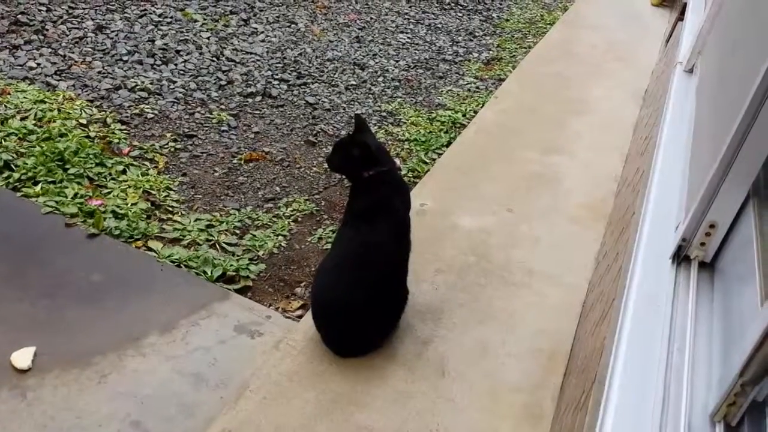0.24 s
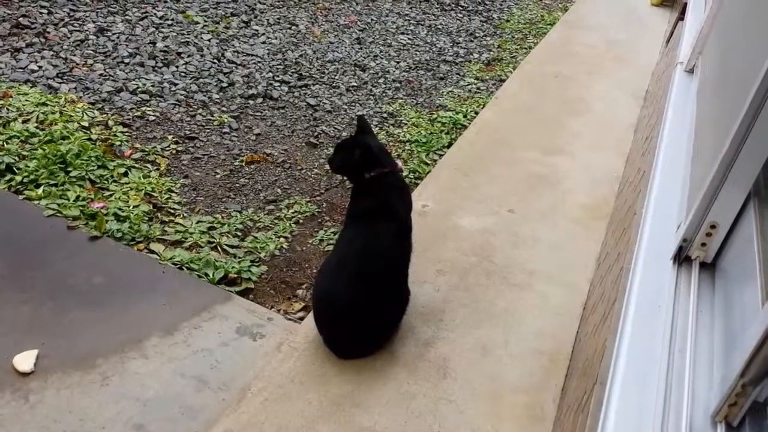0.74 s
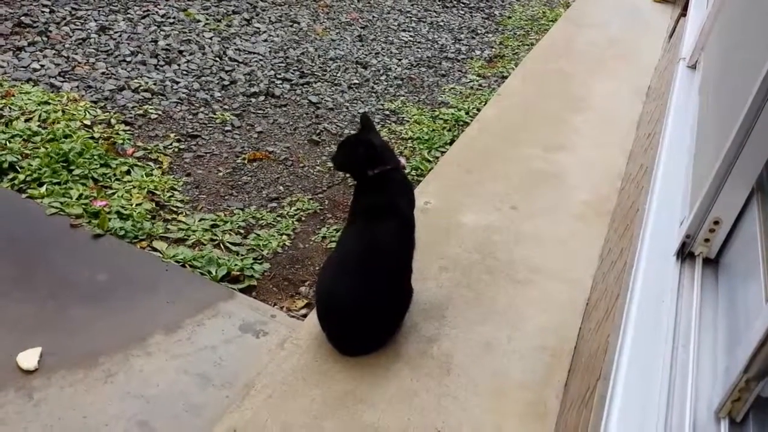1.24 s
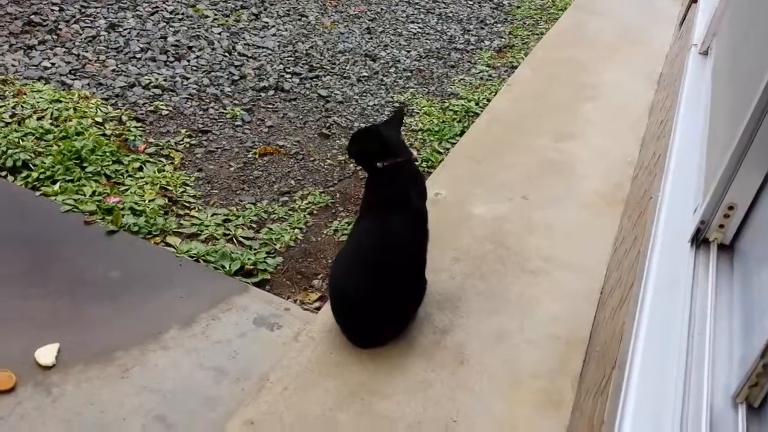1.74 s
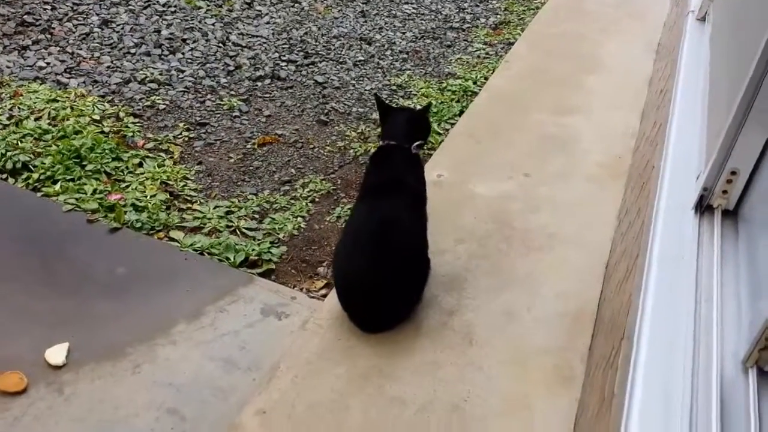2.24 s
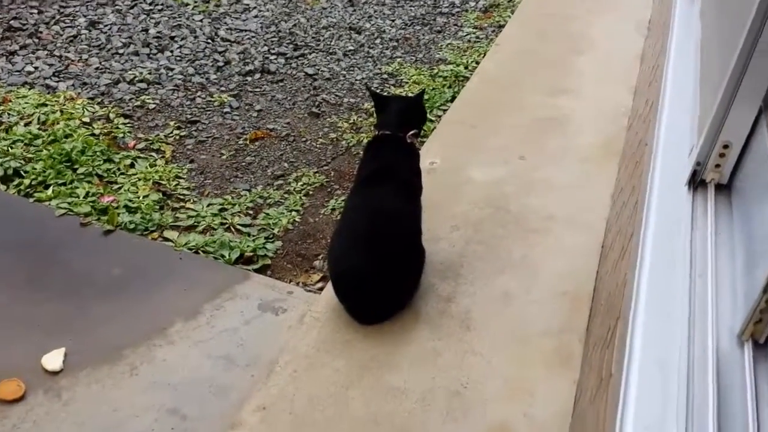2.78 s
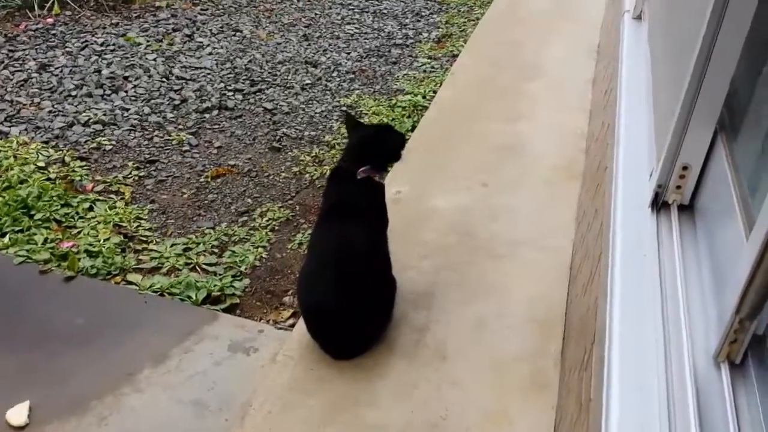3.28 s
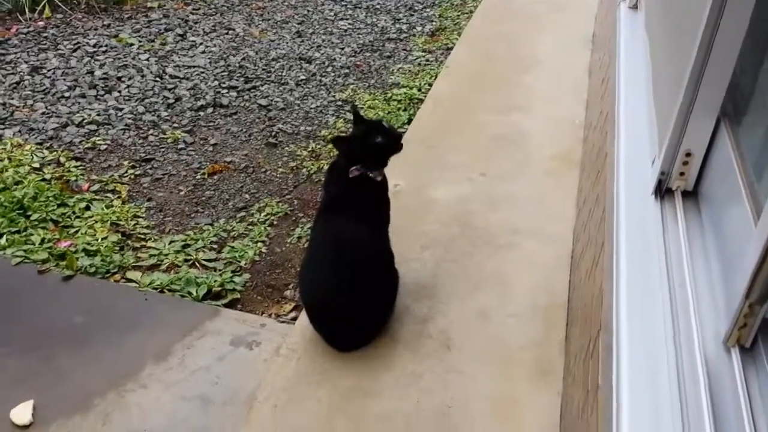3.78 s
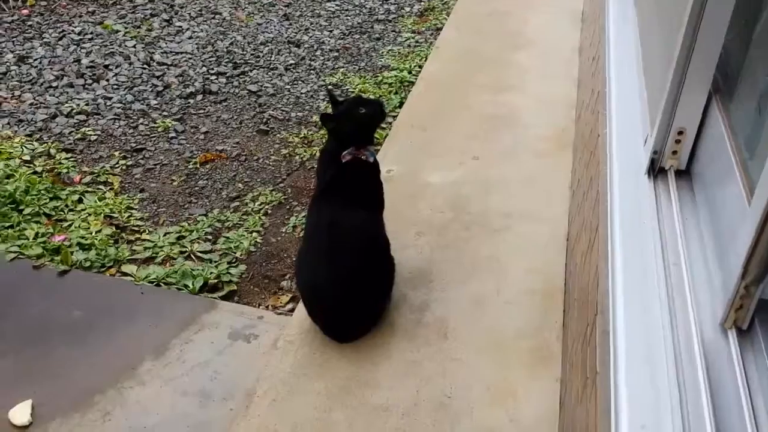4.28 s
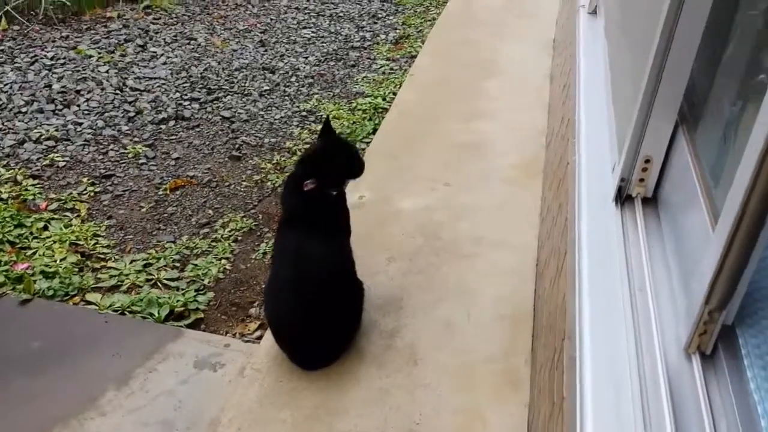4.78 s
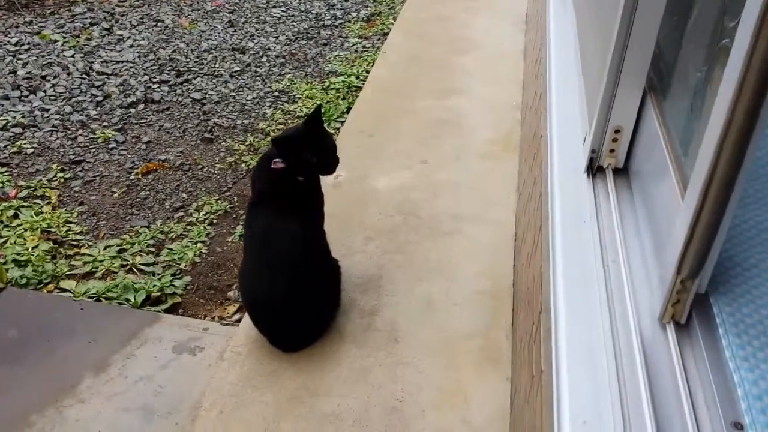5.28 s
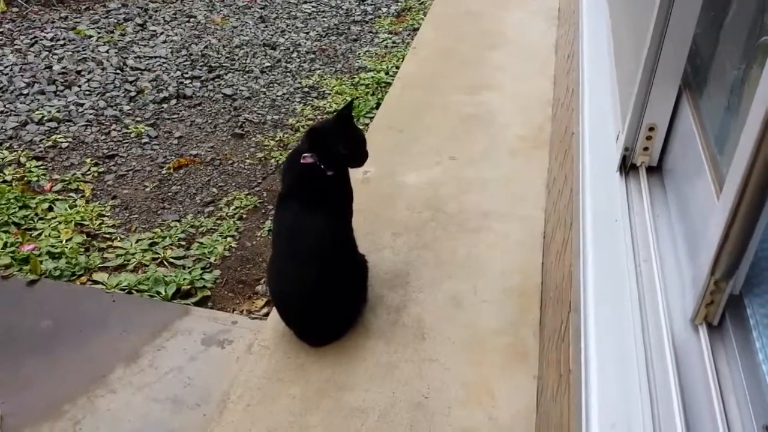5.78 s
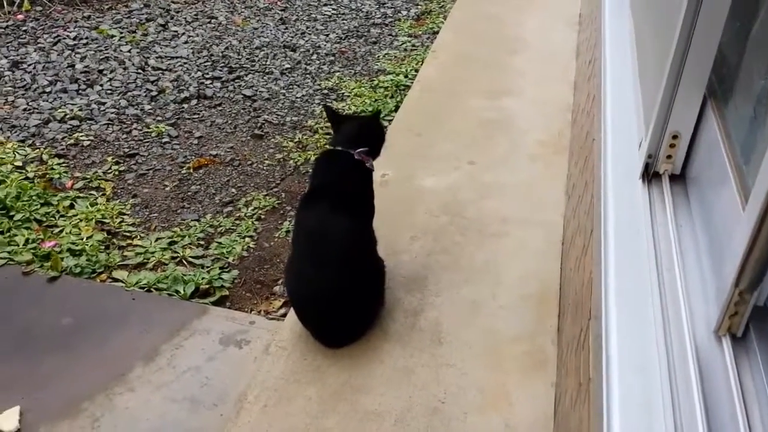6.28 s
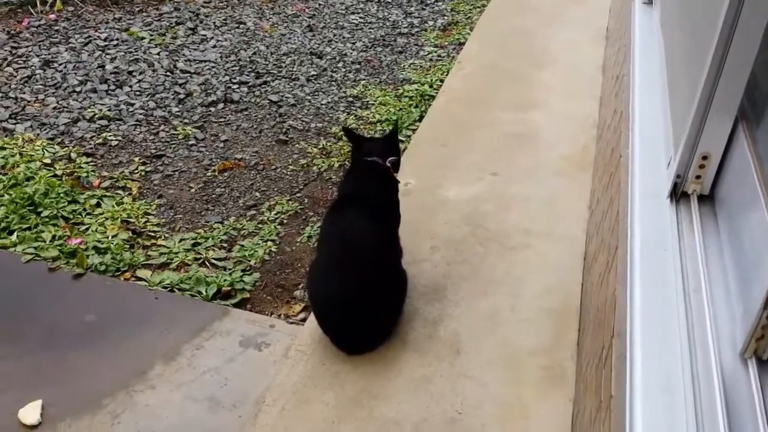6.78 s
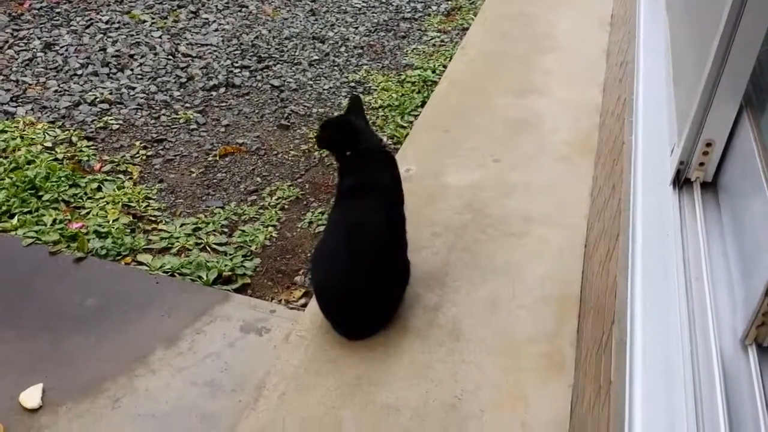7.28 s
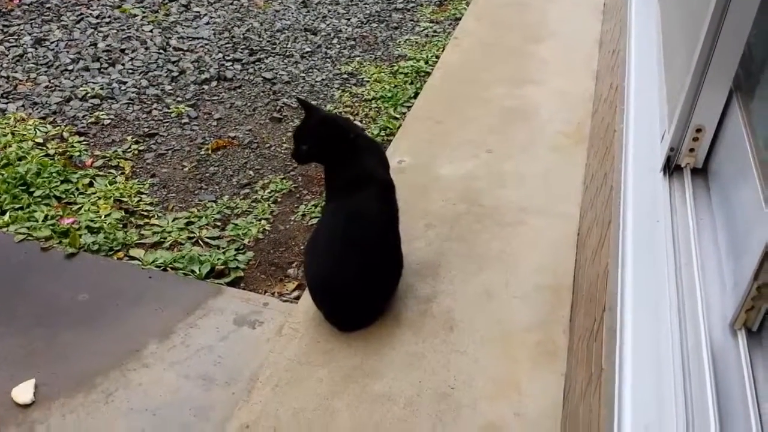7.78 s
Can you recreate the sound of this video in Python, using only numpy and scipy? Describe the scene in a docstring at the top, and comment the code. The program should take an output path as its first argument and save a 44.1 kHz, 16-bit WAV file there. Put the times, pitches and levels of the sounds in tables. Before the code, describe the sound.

The setting is quiet and outdoors, with faint air hiss, a distant traffic hum, a thin high insect tone and occasional far bird chirps. Two tiny ticks come around 1 second. From 1.7 to 2.5 seconds a cat meows, hoarse and wavering, ending lower, with a short echo off a house wall. At 2.1 seconds a sharp, very loud pop hits the right side of the microphone. Light rustling and clicks start around 3 seconds, and a second, longer raspy meow runs from 3.4 to 4.5 seconds, sliding down in pitch and ending with a crisp snap. A lull follows, broken by a brief crackle near 5.8 seconds. From 6.7 seconds, something like a thin bag crinkles and snaps close to the microphone, growing denser and louder until the end at 8 seconds. A few soft, low bumps touch the microphone along the way.

```python
"""A cat meows twice, hoarse and wavering, on a concrete path beside a house wall that echoes it.
Its vocal folds make a tone with puffs of breath, and its mouth shapes the vowel.
Close by, something like a thin bag rustles and snaps as its creases give way. Soft bumps touch the
camera, and one sharp pop hits the right microphone port (the opening that lets sound in).
Behind it all the air hisses, far traffic hums, and an insect and far birds sing faintly."""
import sys
import numpy as np
from scipy import signal
from scipy.fft import rfft, irfft, next_fast_len
from scipy.io import wavfile
from scipy.ndimage import uniform_filter1d, map_coordinates

SR = 44100
rng = np.random.default_rng(int(sys.argv[2]) if len(sys.argv) > 2 else 0)


def transcribe(signal):
    """Save signal, clipped to [-1, 1], as a 16-bit WAV file at the path in sys.argv[1]."""
    frames = np.atleast_2d(signal).T
    limited = np.clip(frames, -1, 1)
    pcm = np.round(limited * 32767).astype(np.int16)
    wavfile.write(sys.argv[1], SR, pcm)


N = 354123


def cat():
    """Two meows, each a chain of short notes that ends lower, with the mouth nearly shut."""
    # start/s, first pitch/Hz, last pitch/Hz, level/dB, mouth open/0-1, hoarseness/0-1,
    # boosts of partials 2, 3 and 4/dB, boost of the upper partials/dB
    first_notes = [(1.7, 791.1, 827.8, -62.5, 0.03, .4, -3, -3, -20, -30),
                   (1.772, 744.3, 768, -43.5, 1, 0.35, -.5, -12, -20.5, -41),
                   (1.81, 768.8, 814, -40.5, 0.99, 0.4, -.5, -1.5, 12.5, -24),
                   (1.865, 875, 889.6, -35.5, 1, .55, -.5, -1.5, -3.5, -35.5),
                   (1.893, 797.5, 801.5, -39.5, 1, .6, -.5, -3, -2, -29),
                   (1.945, 844.5, 840.7, -42.5, 1, 0.55, -.5, -9, -6, -31.5),
                   (1.968, 818.2, 812.8, -39, 0.94, 0.52, -.5, -1.5, -8.5, -22.5),
                   (2.018, 725.2, 729.7, -41, 1, 0.57, -.5, -12, -7, -26),
                   (2.042, 787.2, 831.2, -40, 1, 0.4, -.5, -1.5, -8, -32.5),
                   (2.075, 757, 728, -40.5, 0.84, 0.7, -.5, -12, -3, -35),
                   (2.1, 735, 740, -56, 0.9, 0.9, -.5, -3, -3, -35),
                   (2.127, 735, 702, -38.5, 1, 0.43, -.5, -1.5, -9, -38),
                   (2.195, 680.5, 705.1, -40, 0.92, 0.35, -.5, -1.5, 0, -33.5),
                   (2.302, 677.5, 680.8, -42.5, .9, 0.4, -.5, -3, 0, -41),
                   (2.372, 660, 655, -61, 0.19, .5, -8, -1.5, 0, -30),
                   (2.395, 650, 664, -59, .2, .4, -7, -1.5, 3.5, -28.5),
                   (2.48, 665.4, 630.2, -64.5, 0.08, 0.4, -8, -1.5, -1.5, -30)]
    second_notes = [(3.352, 715, 790, -39, 1, .75, -12, -.5, -10, -20),
                    (3.392, 800, 835, -46, 1, 0.89, -6, -3, -4, -18),
                    (3.428, 875, 850, -48.5, 0.58, 0.72, -3, -1.5, -3, -21),
                    (3.462, 840, 820, -54, 0.58, 0.8, -3, -3, -3, -21),
                    (3.49, 861.3, 833.2, -42, 1, 0.563, -1.5, -.5, -5.5, -23.5),
                    (3.568, 766.1, 784.2, -43.5, 0.634, .55, -1.5, -4, 3.5, -24),
                    (3.628, 796.4, 779.9, -44.5, 0.383, .5, -3, -1.5, 2, -16.5),
                    (3.73, 811.6, 820.7, -41, 0.234, .45, 1.5, -1.5, -8, -16),
                    (3.79, 774.5, 746.9, -45.5, 0.266, .45, -.5, -4, 3, -12),
                    (3.85, 745.5, 726.4, -44.5, 0.39, .45, -5, -3, 4, -15),
                    (3.91, 735, 710, -47, 0.18, .5, -4, -4, 3.5, -13),
                    (3.99, 708, 696, -47, 0.18, .4, -2.5, -5, 0, -13),
                    (4.075, 670, 628.8, -51, 0.223, 0.4, -8, -.5, 2, -13),
                    (4.15, 636, 628.8, -52, 0.158, 0.3, -4, -3, 1.5, -15),
                    (4.31, 632.5, 649.8, -52, .2, 0.3, -5, -2.5, 2.5, -10.5),
                    (4.46, 640, 628, -52, 0.023, 0.3, -6, -.5, -4.5, -17.5),
                    (4.503, 600, 490, -57, 0.029, 0.35, -15, -15, -12, -17.5)]
    # how the mouth shapes the four lowest partials: f/Hz, gain when open/dB, gain when nearly shut/dB
    first_vowel = [(703, -29.5, -11), (835.6, -14, 2.5), (1350, -1, -2.5), (1613, 1, -8.5), (2090, -18, -3),
                   (2480, -13, -12), (2752, -20, 3), (3280, -31, -19.5)]
    second_vowel = [(613, -15, 0), (828, -13.5, -2.5), (1285, -10.5, -5.5), (1562, -10, 4),
                    (1875, -6, -3.5), (2310, 1, -9), (2577, 0.5, -1.5), (3120, -0.5, -10),
                    (3510, -8.5, -18.5)]
    # one row a meow: end/s, first left over right/dB, last left over right/dB
    endings = [(2.55, -0.5, 8), (4.539, 3, 4.6)]
    return meow(first_notes, first_vowel, endings[0]) + meow(second_notes, second_vowel, endings[1])


def meow(notes, vowel, ending):
    """Vocal folds make partials (tones at multiples of the pitch) and puffs of breath."""
    # tone colour of the upper partials and of the breath: f/Hz, level/dB
    upper_colour = [(3200, -14), (3700, -12), (4200, -6), (5000, -20), (5700, -4), (6400, -4), (7200, -18),
                    (9000, -28)]
    breath_colour = [(300, -39), (800, -14), (1150, -4), (1600, 16), (2700, 3), (4000, -17), (6000, -16.5),
                     (10000, -20), (14800, -22.5)]
    glide_s, break_s, break_db = 0.014, 0.008, -7  # notes blend, with a brief dip at each break
    end_s, *pans_db = ending
    start, first_hz, last_hz, *held = np.transpose(notes)
    first = round(start[0] * SR)
    t = np.arange(first, round(end_s * SR)) / SR
    note = np.clip(np.searchsorted(start, t) - 1, 0, None)
    since = t - start[note]
    pitch = first_hz[note] + (last_hz - first_hz)[note] * since / np.diff(start, append=end_s)[note]
    pitch = uniform_filter1d(pitch, size=200)
    level_db, mouth, hoarse, *boosts_db, upper_db = [
        uniform_filter1d(column[note], round(glide_s * SR), mode="nearest") for column in held]
    level_db = level_db + uniform_filter1d(break_db * np.exp(-since / break_s), size=200)
    # the pitch jitters in small random steps, 43 a second, making the meow sound rough
    jitter = uniform_filter1d(rng.standard_normal(200)[((t - t[0]) * 43).astype(int)], size=60)
    shake = hoarse * (0.01209 * jitter + 0.016 * wobble(89.91, t))
    phase = 2 * np.pi * np.cumsum(pitch * (1 + shake)) / SR
    wide, shut = np.array(vowel)[:, [0, 1]], np.array(vowel)[:, [0, 2]]
    low_db = [level_db + mouth * along(wide, k * pitch) + (1 - mouth) * along(shut, k * pitch) + boost
              for k, boost in enumerate([0, *boosts_db], 1)]
    high_db = [level_db + upper_db + along(upper_colour, k * pitch) for k in range(5, 11)]
    voice = np.zeros((2, len(t)))
    for k, db in enumerate(low_db + high_db, 1):
        rasp = 3.77 * wobble(60.13, t) + 3.5 * wobble(170, t)
        fading = 1.3 * wobble(22, t)  # each partial comes and goes on its own
        for side in range(2):  # paths off wall and ground shift it differently at the two ports
            drift = uniform_filter1d(0.35 * np.sqrt(k) * wobble(24.95, t), size=16)
            flutter = uniform_filter1d(hoarse * (rasp + 3.3 * wobble(40.08, t)) + fading, size=16)
            voice[side] += np.sqrt(2) * amp(db + flutter) * np.sin(k * phase + drift)
    effort = np.sqrt(sum(amp(db) ** 2 for db in low_db))
    breath = coloured(white_noise(), breath_colour, alike=[(500, 0.65)])[:, :len(t)]
    puffs = breath * (1 + np.cos(phase))  # one each time the folds open
    fade = np.clip(np.minimum(t - t[0], t[-1] - t) / 0.0088, 0, 1)
    pan_db = np.linspace(*pans_db, len(t))
    call = fade * (voice + amp(-13.5) * effort * hoarse * puffs) * amp([pan_db / 2, -pan_db / 2])
    return np.pad(call, ((0, 0), (first, N - first - len(t))))


def rustle():
    """The bag rustles: clumps of tiny creases give way over the noise of rubbing."""
    # three tone colours of the rustle: f/Hz, level/dB
    crisp_colour = [(500, -22.5), (900, -1), (1500, -1), (2500, 6), (4500, 0), (5500, -3), (7500, -32),
                    (9500, -25)]
    bright_colour = [(3820, -14), (6500, -3), (7550, -5), (12800, -11.5), (13600, -18), (14900, -34.5)]
    dull_colour = [(24, -27), (40, -17), (224, -3.5), (329, 1), (390, -3), (890, -4), (1200, -8.5),
                   (1560, -23), (2640, -120)]
    # where the rustling is: t/s, left over right/dB
    position = [(0, 0), (2.95, 0), (3.04, -9), (3.3, -9), (3.45, -9), (3.6, -3), (4.4, -2), (4.6, 0),
                (6.7, 1), (8.03, 1)]
    t = np.arange(N) / SR
    crisp_db, bright_db, dull_db, crackle = handling(t)
    spikes = (rng.random(N) < .02) * amp(np.minimum(4 * rng.exponential(size=N), 9))
    creases = signal.lfilter([1], [1, -.97], spikes)  # each dies in about a millisecond
    clumps = amp(2.6 * crackle * wobble(110, t))
    grain = (1 + 1.1 * crackle * creases) / (1 + 1.1 * crackle) * clumps
    noise = np.sqrt(1 - crackle) * white_noise() + np.sqrt(crackle) * patchy_noise(depth_db=4)
    crisp = amp(crisp_db + 1.92) * coloured(noise, crisp_colour, alike=[(2000, 0.261)])
    bright = amp(bright_db + 2.5) * coloured(noise, bright_colour, alike=[(9000, 0.28)])
    dull_gain = amp(dull_db - 1 + 2.37 * wobble(30, t))
    dull = dull_gain * coloured(white_noise(), dull_colour, alike=[(300, 0.557)])
    pan_db, = curves(position, t)
    pan = amp([pan_db / 2, -pan_db / 2]) / np.sqrt(np.cosh(pan_db * np.log(10) / 20))  # same total power
    return (left_first(grain * (crisp + bright), seconds=0.0002229) + dull) * pan


def handling(t):
    """Strokes swell and fade over faint stirring: crisp, bright and dull dB, and the share of crackle."""
    # start/s, end/s, 20 dB rise/s, 20 dB fall/s, crisp level/dB,
    # bright over crisp/dB, dull over crisp/dB, crackle/0-1
    strokes = [(0.807, .87, .12, .3, -71, -2.5, -2, 0.05), (1.522, 1.535, 0.44, 0.15, -70.5, -4, -0.5, 0),
               (1.98, 2.042, .5, 0.41, -65.5, 1.5, 7.5, 0), (2.22, 2.33, 0.31, 0.35, -66.5, -1, -4.5, 0.01),
               (2.57, 2.598, 0.22, 0.566, -61.5, -12.5, -6.5, 0.02),
               (2.801, 2.875, 0.02, 0.059, -62, -2.5, -3.5, 0),
               (3.053, 3.119, .05, 0.11, -62.5, -6, 0, 0.08),
               (3.147, 3.215, 0.0358, 0.0484, -56, -3.5, -1, 0.14),
               (3.313, 3.347, 0.0012, 0.134, -54.5, -5.5, -3, 0.28),
               (3.34, 3.41, 0.1024, 0.106, -44.5, -5.5, -14, 0.08),
               (3.433, 3.535, 0.0661, 0.087, -55.5, -9, -7.5, 0.11),
               (3.563, 3.597, 0.1747, 0.091, -49, -10.5, -11, 0.17),
               (3.7, 3.85, .5, 1.393, -59.5, -4, -1, 0.04),
               (4.451, 4.497, 0.17, 0.0405, -53, -0.5, -4.5, 0.18),
               (5.806, 5.847, 0.0071, 0.033, -57, 1.5, -5.5, 0.45),
               (5.903, 5.914, 0.1172, 0.049, -64.5, 6.5, -0.5, 0.23),
               (6.823, 6.88, 0.055, .05, -50.5, 0.5, -5.5, 0.7),
               (6.866, 6.914, 0.0304, 0.0136, -45.5, 3.5, -12, 0.55),
               (6.934, 6.986, 0.051, 0.043, -54.5, 1.5, -1.5, 0.4),
               (7.001, 7.038, 0.06, 0.035, -50.5, 2, -2.5, 0.55),
               (7.052, 7.104, 0.0778, 0.046, -55, 1, -4.5, 0.44),
               (7.136, 7.185, 0.1471, .05, -59, -0.5, -3, 0.37),
               (7.316, 7.336, 0.0642, 0.045, -52.5, -1, -5.5, 0.59),
               (7.348, 7.383, 0.0486, 0.047, -48, 0, -3.5, 0.75),
               (7.401, 7.506, 0.1365, 0.078, -56.5, 2.5, -5.5, 0.53),
               (7.591, 7.622, 0.0448, 0.0252, -53.5, 4.5, -3, 0.59),
               (7.689, 7.726, 0.0379, .05, -54, 3.5, -6, 0.58),
               (7.747, 7.804, 0.0342, 0.036, -46, 2, -1, 0.74),
               (7.83, 7.838, 0.01, 0.036, -47, 0.5, -1.5, 0.52),
               (7.866, 7.939, 0.0034, 0.056, -48, 0.5, -5.5, 0.43),
               (7.936, 7.99, 0.0246, 0.062, -43.5, 0, -6.5, 0.95),
               (8.011, 8.03, 0.027, .1, -41, 1.5, -5.5, 0.82)]
    # faint rustle between strokes: t/s, crisp level/dB
    stirring = [(0, -78), (.6, -77), (1, -75), (1.4, -79.5), (1.8, -69), (2.7, -68.5), (2.95, -75.5),
                (3.5, -68), (4.4, -66.5), (4.56, -73.5), (4.9, -71), (5.3, -77.5), (6.1, -74), (6.5, -76.5),
                (6.75, -74), (7.25, -69.5), (8.03, -69)]
    stir_bright_db, stir_dull_db = 0.16, -1.5  # over crisp
    power = amp(curves(stirring, t)[0] + np.array([[0], [stir_bright_db], [stir_dull_db]])) ** 2
    crackle_power = np.zeros(len(t))
    for start, end, rise_s, fall_s, db, bright_db, dull_db, crackle in strokes:
        drop_db = 20 * np.maximum(0, np.maximum((start - t) / rise_s, (t - end) / fall_s))
        swell = amp(db - drop_db) ** 2
        power += swell * amp([[0], [bright_db], [dull_db]]) ** 2
        crackle_power += swell * np.clip(crackle, 0, 1)
    return *(10 * np.log10(power)), crackle_power / power[0]


def patchy_noise(depth_db):
    """Noise that is louder in short random patches of time and pitch, as different creases give way."""
    spectra = signal.stft(white_noise(), nperseg=256)[2]
    patches = uniform_filter1d(rng.standard_normal(spectra.shape[1:]), size=9, axis=0)
    patches = uniform_filter1d(patches, size=4, axis=1)
    return unit(signal.istft(spectra * amp(depth_db * unit(patches)), nperseg=256)[1][:, :N])


def snaps():
    """The thin film snaps: each time a noisy crack, a short ring and a low knock."""
    # t/s, level/dB, ring pitch/Hz, knock gain/dB, left over right/dB
    events = [(0.9896, -43.5, 5200, -34, 9.5), (1.1824, -48, 2020, -17.5, 7), (2.5623, -45, 2830, -9.5, -2),
              (3.0681, -40.5, 4130, -11.5, -25), (3.0909, -47, 2450, -7.5, -17.5),
              (3.2144, -42, 2340, -16, -14.5), (3.2973, -37.5, 6300, -8, -15), (4.4595, -27, 1350, -17, -4),
              (4.6192, -48, 2050, -5, -2), (4.8673, -52.5, 5700, -1, 3.5), (5.8118, -39.5, 3970, -20.5, 4),
              (5.8316, -28.5, 5450, -17.5, 3), (5.901, -34, 4960, -27, -4),
              (6.7255, -36.5, 3560, -27.5, 0.5), (6.8237, -26.5, 3560, -19.5, 0),
              (6.8532, -24, 2870, -46.5, 8), (6.876, -19, 5124, -31, 8), (6.866, -29, 5500, -28.5, 5),
              (6.8896, -23.5, 6560, -21.5, 4), (6.905, -31, 6000, -20.5, -1.5),
              (6.921, -33.5, 4000, -18, 2), (6.9895, -32.5, 3560, -13, 0.5),
              (7.1742, -28.5, 5580, -18.5, 1.5), (7.3183, -26.5, 5420, -29.5, 8.5),
              (7.3528, -29.5, 2950, -36, 5), (7.3644, -19.5, 5700, -31.5, -4),
              (7.431, -34, 5900, -15.5, -3), (7.4603, -37, 5800, -19, -2.5), (7.5381, -38, 5470, -25, 8),
              (7.6, -13.5, 4630, -31, 1), (7.619, -24.5, 3130, -23.5, -2), (7.7128, -31, 3870, -15, 2.5),
              (7.7328, -15, 3210, -23, 0), (7.7569, -28, 4300, -23, -1), (7.7629, -20.5, 5300, -23.5, 2.5),
              (7.78, -32.5, 5500, -24.5, 1.5), (7.792, -27.5, 5800, -31, -0.5),
              (7.8009, -21.5, 2030, -23.5, 4), (7.828, -21.5, 5080, -25.5, -0.5),
              (7.862, -18.5, 5490, -39, -4.5), (7.8675, -24, 5100, -16, 6), (7.9346, -22, 3140, -22, -0.5),
              (7.9461, -35, 4850, -22, 1), (7.9503, -22, 4880, -31, 8.5), (7.9599, -20.5, 5037, -38.5, -13),
              (8.0105, -12.5, 4010, -30.5, 2.5), (8.016, -14, 4710, -20.5, -1)]
    cracks, knocks = np.zeros((2, 2, N + SR))
    t = np.arange(SR // 20) / SR
    swell = 1 - np.exp(-t / .0005)
    knock = dying_tone(t, hz=750, fade_s=0.0109) + 0.53 * dying_tone(t, hz=240, fade_s=0.0156)
    for start, db, hz, knock_db, pan_db in events:
        noise = rng.standard_normal((2, len(t)))
        crack = (noise + 0.964 * noise[0]) * (decay(t, 0.01308) + 0.05 * decay(t, 0.0327))
        ring = dying_tone(t, hz, fade_s=.005)
        gain = swell * amp(db + np.array([[pan_db], [-pan_db]]) / 2)
        cracks[:, round(start * SR):][:, :len(t)] += gain * (0.949 * crack + 1.9 * ring)
        knocks[:, round(start * SR):][:, :len(t)] += gain * amp(knock_db + 10) * knock

    def film(f):
        """Thin film gives no bass and a broad peak in the treble."""
        bass_cut = (1j * f / (1500 + 1j * f)) ** 2
        return bass_cut * resonance(f, hz=6500, loss=1.1) / (1 + 1j * f / 9500) ** 2

    cracks = filtered(cracks[:, :N], film) * amp([[-1], [.5]])
    return left_first(cracks + knocks[:, :N], seconds=0.0002044)


def pop():
    """A sudden pressure step hits the right port and drains away."""
    # t/s, peak/dB, the port's bass cutoff/Hz, damping/0-1
    hit = (2.1075, .4, 97, .62)
    start, db, hz, damping = hit
    t = np.arange(N) / SR - start
    angle = 2 * np.pi * hz * np.maximum(t, 0)
    rate = np.sqrt(1 - damping ** 2)
    step = np.exp(-damping * angle) * (np.cos(rate * angle) - damping / rate * np.sin(rate * angle))
    slow_push = .09 * np.exp(-angle / 6) * np.sin(angle / 5)

    def port(f):
        """The port resonates, loses the highest treble and leaks slowly."""
        leak = 1j * f / (18 + 1j * f)
        return resonance(f, hz=8000, loss=1.05) / (1 + (f / 10300) ** 24) * leak

    pulse = filtered((t >= 0) * (step + slow_push), port)
    return pulse / pulse.max() * amp([[db - 60], [db]])


def bumps():
    """Each soft bump on the camera is a low swing that dies quickly."""
    # t/s, level/dB, f/Hz
    touches = [(2.030, -45, 150), (2.561, -52, 156), (4.615, -54, 120), (4.867, -51, 253),
               (5.849, -55, 226), (6.576, -53, 207), (7.365, -49, 258), (7.752, -42, 331),
               (7.939, -50, 285)]
    out, t = np.zeros(N + SR), np.arange(SR // 10) / SR
    swell = 1 - np.exp(-t / .003)
    for start, db, hz in touches:
        out[round(start * SR):][:len(t)] += amp(db + 6) * swell * dying_tone(t, hz, fade_s=.04)
    return out[:N]


def wall_echo(x, db):
    """The house wall and path throw sound back; each frequency dies at its own speed."""
    # f/Hz, time to fade by 60 dB/s
    fade_times = [(200, 0.283), (2000, 0.338), (10000, .08)]
    hz, t, spectra = signal.stft(rng.standard_normal((2, SR // 3)), SR, nperseg=256)
    tail = signal.istft(spectra * decay(t, along(fade_times, hz)[:, None]), SR, nperseg=256)[1]
    return amp(db) * signal.fftconvolve(x, tail / np.linalg.norm(tail[0]), axes=1)[:, :N]


def air_and_traffic():
    """The air hisses and far traffic hums, both slowly rising and falling."""
    # tone colours: f/Hz, level/dB
    hiss_colour = [(25, -19.5), (45, -27.5), (110, -2.5), (200, -5), (400, -12.5), (800, -9), (1500, -12.5),
                   (2800, -19), (5000, -24.5), (8000, -23.5), (13000, -19), (14900, -27.5)]
    hum_colour = [(22, -22), (45, -16), (57, -4), (64, 0.5), (72, -8), (90, -10), (120, -18), (185, -22),
                  (199, -8), (215, -24)]
    # t/s, hiss level/dB, hum level/dB
    levels = [(0, -65.5, -68), (1, -65.5, -70), (1.7, -65, -71.5), (3, -61, -74.5), (4, -55, -68.5),
              (5, -66.5, -79), (6.5, -66.5, -79.5), (7, -61, -70.5), (8.03, -59.5, -72.5)]
    # how alike the hiss is on both sides: f/Hz, likeness/-1 to 1
    hiss_alike = [(60, 0.57), (180, 0.784), (550, 0.284), (1650, 0.703), (4970, -0.52), (15000, -0.03)]
    t = np.arange(N) / SR
    hiss_db, hum_db = curves(levels, t)
    hiss = amp(hiss_db + 0.41 * wobble(2.438, t)) * coloured(white_noise(), hiss_colour, hiss_alike)
    hum = amp(hum_db + 1.5 * wobble(1.445, t)) * coloured(white_noise(), hum_colour, alike=[(60, 0.71)])
    return hiss + hum


def insect():
    """An insect sings: a thin, high band of noise whose level flickers."""
    # f/Hz, width/Hz, level/dB
    pitch_band = (5660, 80, -78)
    hz, width, db = pitch_band
    song = filtered(white_noise(), lambda f: np.exp(-((f - hz) / width) ** 2))
    return amp(db + 1.5 * wobble(12, np.arange(N) / SR)) * unit(song)


def far_birds():
    """Each faint call is a sliding tone, blurred by random scatter of its pitch."""
    # start/s, end/s, first pitch/Hz, last pitch/Hz, blur/Hz, level/dB
    calls = [(.08, .25, 4400, 3790, 250, -71.5), (.8, 0.926, 4438, 4285, 400, -63.5),
             (1.029, 1.118, 3700, 4096, 200, -68.5), (2.18, 2.359, 4784, 6200, 699, -55),
             (2.56, 2.702, 2500, 3002, 348, -54.5), (4.08, 4.229, 1148, 1080, 59.91, -54),
             (4.631, 4.897, 1257, 1047, 95, -63.5), (5.0, 5.122, 4870, 4850, 40, -74),
             (5.1, 5.261, 4600, 4510, 90, -73)]
    out = np.zeros((2, N))
    for start, end, first_hz, last_hz, blur_hz, db in calls:
        scatter = unit(uniform_filter1d(rng.standard_normal((2, SR // 2)), size=40))
        progress = np.linspace(0, 1, round((end - start) * SR))
        hz = first_hz + (last_hz - first_hz) * progress + blur_hz * scatter[:, :len(progress)]
        swell = np.sqrt(np.sin(np.pi * progress).clip(0))
        tone = np.sin(2 * np.pi * np.cumsum(hz, axis=1) / SR)
        out[:, round(start * SR):][:, :len(progress)] += amp(db) * swell * tone
    return out


def amp(db):
    """Turn decibels into a gain to multiply by."""
    return 10 ** (np.asarray(db) / 20)


def unit(x):
    """Scale x to an average power of 1."""
    return x / np.sqrt(np.mean(x ** 2) + 1e-20)


def white_noise():
    """Separate noise for left and right."""
    return rng.standard_normal((2, N))


def decay(t, fade_s):
    """A gain that falls 60 dB in fade_s seconds."""
    return amp(-60 * t / fade_s)


def dying_tone(t, hz, fade_s):
    """A pure tone that fades away."""
    return np.sin(2 * np.pi * hz * t) * decay(t, fade_s)


def resonance(f, hz, loss):
    """A filter that peaks near hz and falls above it; more loss flattens the peak."""
    return 1 / (1 - (f / hz) ** 2 + 1j * loss * f / hz)


def along(points, hz):
    """Read between (f/Hz, value) points on a logarithmic frequency scale."""
    f, values = np.transpose(points)
    return np.interp(np.log(hz + 1), np.log(f + 1), values)


def curves(rows, t):
    """Turn each column after the first (time) into a curve over t."""
    times, *columns = np.transpose(rows)
    return [np.interp(t, times, column) for column in columns]


def wobble(rate, t):
    """A smooth curve through random points, rate of them a second."""
    points = rng.standard_normal(2000)
    return map_coordinates(points, [(t[::8] - t[0]) * rate], mode="wrap").repeat(8)[:len(t)]


def filtered(x, response):
    """Multiply each frequency f in x by response(f)."""
    size = next_fast_len(N + SR // 2)
    return irfft(rfft(x, size) * response(np.fft.rfftfreq(size, 1 / SR)), size)[..., :N]


def coloured(pair, colour, alike):
    """Give two noises a tone colour and a left-right likeness (f/Hz, likeness), at power 1."""
    def response(hz):
        angle = np.arccos(np.clip(along(alike, hz), -1, 1)) / 2
        outside = (hz < colour[0][0]) | (hz > colour[-1][0])
        return np.where(outside, 0, amp(along(colour, hz))) * [np.cos(angle), np.sin(angle)]

    mid, side = filtered(pair, response)
    return unit(np.array([mid + side, mid - side]))


def left_first(pair, seconds):
    """The sound reaches the left side this much before the right."""
    return filtered(pair, lambda hz: np.exp(1j * np.pi * hz * seconds * np.array([[1], [-1]])))


def scene():
    """Add up all the sources; only the meows and snaps echo."""
    meows, cracks = cat(), snaps()
    echoing = meows + wall_echo(meows, db=-9.5) + cracks + wall_echo(cracks, db=-13.5)
    return echoing + rustle() + bumps() + pop() + air_and_traffic() + insect() + far_birds()


def record(dry):
    """Each microphone port has its own tone colour, and the camera cuts off the highest treble."""
    # f/Hz, left over right/dB
    port_balance = [(60, 1.0), (99, 0.5), (160, 1.5), (270, 1.5), (450, 1.0), (740, 0.0), (1220, 0.5),
                    (2010, 0.5), (3330, 1.0), (5500, 4.5), (9080, -4.5), (15000, -5.0)]
    top_hz = 14750
    return filtered(dry, lambda hz: amp(along(port_balance, hz) * [[.5], [-.5]]) * (hz < top_hz))


dry = scene()
out = record(dry)
transcribe(out)
```